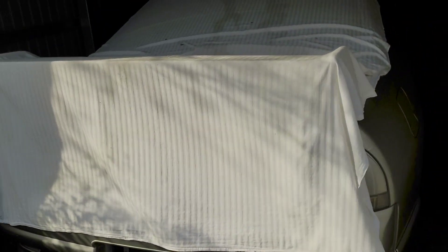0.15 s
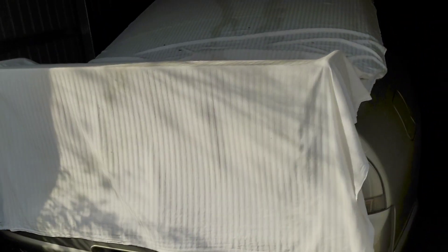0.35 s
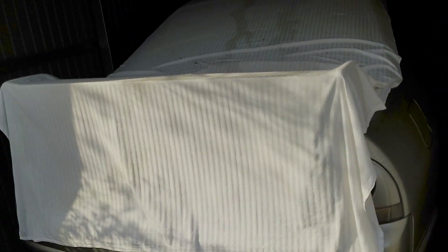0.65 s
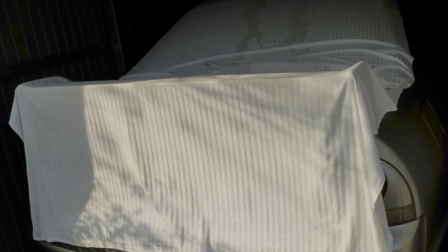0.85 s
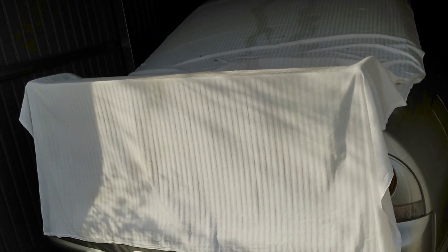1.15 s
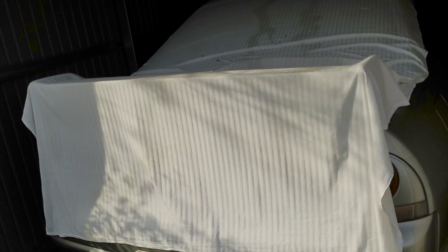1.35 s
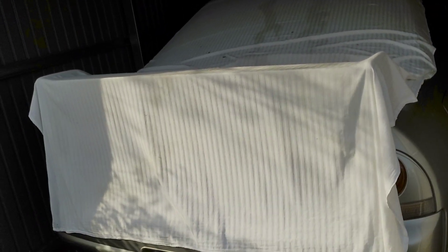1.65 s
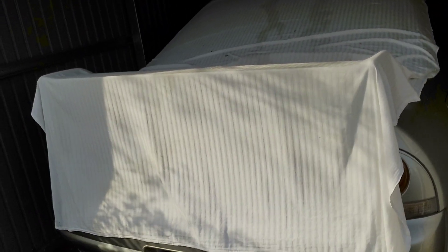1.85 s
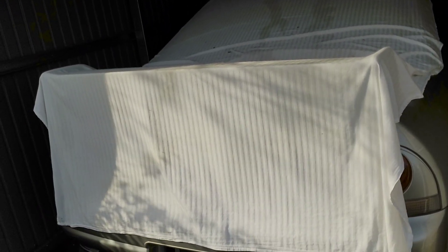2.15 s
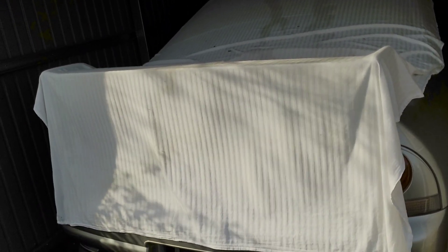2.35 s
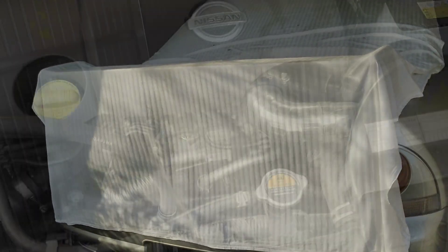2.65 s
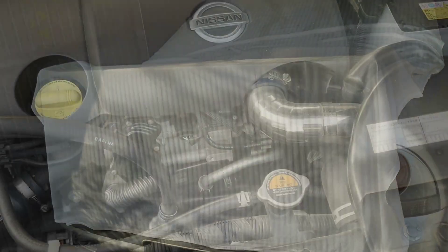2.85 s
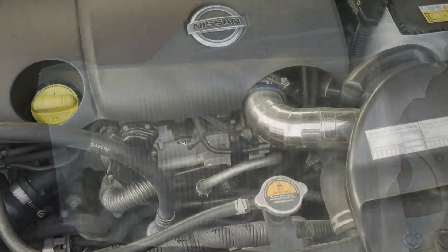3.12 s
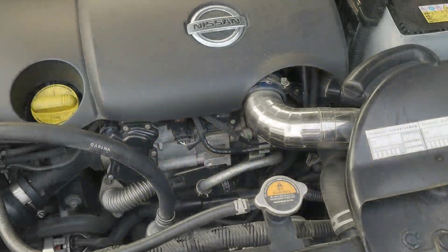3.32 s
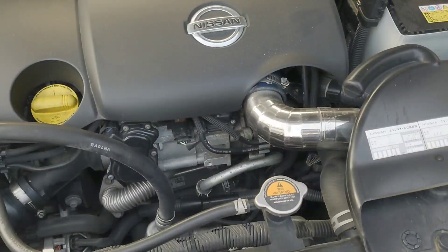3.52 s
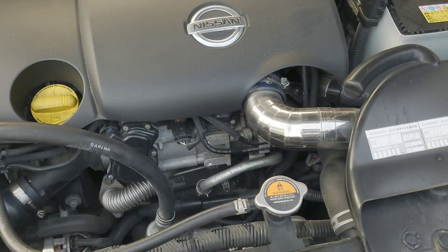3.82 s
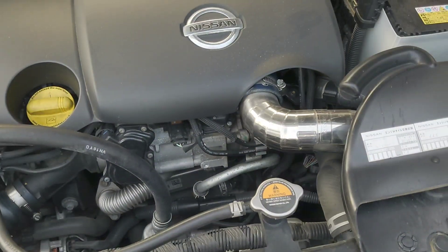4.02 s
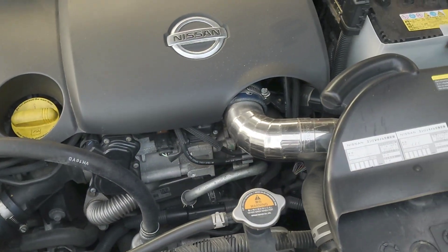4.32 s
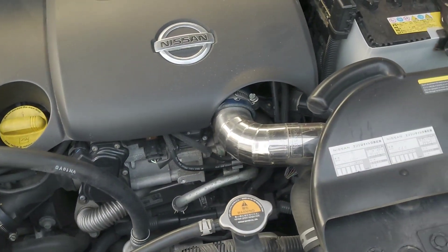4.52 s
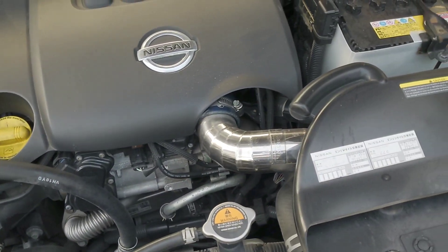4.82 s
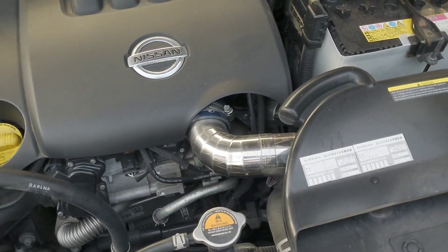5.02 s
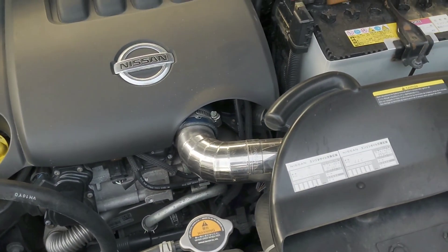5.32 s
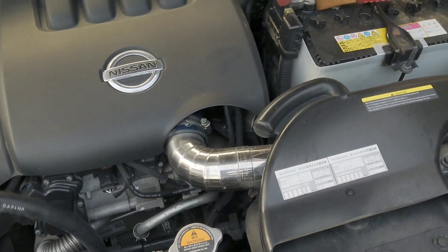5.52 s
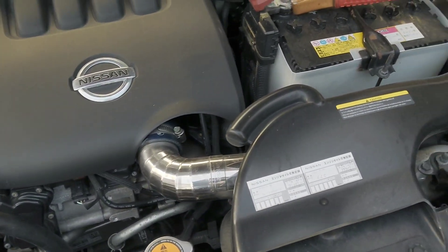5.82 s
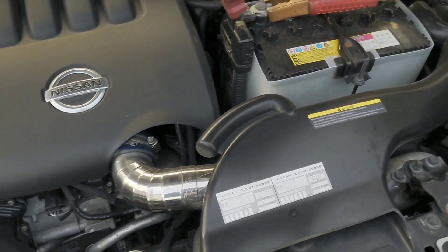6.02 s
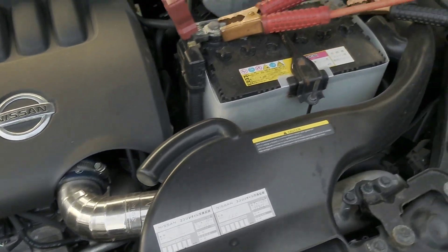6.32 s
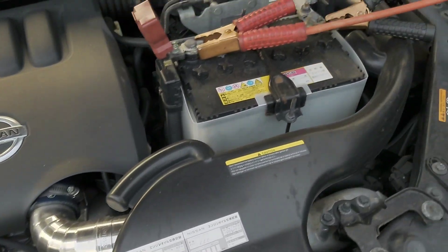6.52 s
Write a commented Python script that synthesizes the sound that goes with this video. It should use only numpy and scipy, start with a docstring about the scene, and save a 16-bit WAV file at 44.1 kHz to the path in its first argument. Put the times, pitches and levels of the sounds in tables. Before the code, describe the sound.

A steady fast engine idle, about twenty-five firings a second, heard in two close stereo views. First it is dull and smeared beneath a cover, with low wind rumble, soft thumps and a tiny early squeak. After about half a second of silence it fades in over the exposed engine, brighter and harder, rattling and hissing, bass arriving slightly late. Moving toward the side makes it less ringing and sharp.

```python
"""Around a parked car, its engine idles at about 25 firings a second, heard first under a cloth cover
while wind bumps the microphone. After a short silence it fades in again from close above the open engine bay.
Every firing gives a low throb, a clatter in the block, a bright knock and a puff of hiss: sums of tones,
shaped noise and ringing modes, in a pattern that repeats every four firings."""
import sys
import numpy as np
from scipy.fft import rfft, irfft, next_fast_len
from scipy.io import wavfile
from scipy.ndimage import uniform_filter1d, map_coordinates

SR = 44100
rng = np.random.default_rng(int(sys.argv[2]) if len(sys.argv) > 2 else 0)


def materialize(psi):
    """Save the field psi as 16-bit PCM at rate SR to the path in sys.argv[1].

    A 1-D psi becomes a single channel; in a 2-D psi each row is a channel.
    """
    bounded = np.clip(np.atleast_2d(psi).T, -1, 1)
    quanta = np.round(bounded * 32767).astype(np.int16)
    wavfile.write(sys.argv[1], SR, quanta)


N = 294147

# The four beats of a cycle. Each row: knock strength in dB, valve tick strength in dB.
BEATS = [(0, -10), (0.5, -3.5), (0.5, -1), (1.5, -5.5)]
# Tones of the low throb, under the cover and in the open.
# Each row: multiple of the firing rate, relative level in dB.
COVERED_ORDERS = [(1, -12), (2, -0.5), (3, -1.5), (4, -11)]
OPEN_ORDERS = [(1, -9), (2, 2.5), (3, -0.5), (4, -8.5), (5, -5.5), (6, -10), (7, -7.5), (8, -7)]
# Steady hum of the parts geared to the shaft. Each row: multiple of the firing rate, relative level in dB.
COVERED_HUM = [(15, -1.6), (21, -0.26), (29.5, -0.8), (34, -1.5)]
OPEN_HUM = [(15, -8), (21, -9.5), (26, 0.5), (27, 0), (31.5, -5), (35, -5.5)]
# What each firing rings: the castings, the cylinder head (open, then covered) and the valves.
# Each row: frequency in Hz, relative level in dB, time to die away by 60 dB in seconds,
# spread between the four beats in dB.
CASTING_MODES = [(584, -11, 0.081, 3.5), (788, -1, 0.099, -1.5), (986.4, 6, 0.054, 0.5),
                 (1053, -3, 0.09, -1), (1151, -8.5, 0.049, -7)]
HEAD_MODES = [(1897, 1, 0.026, 5), (1970, -1, 0.031, 0), (2680, -22.5, 0.044, 0)]
COVERED_HEAD_MODES = [(1886, -3, .03, 2.5), (1988, 7, 0.038, 1.5)]
VALVE_MODES = [(3710, -1.5, 0.052, 7), (4925, 1, 0.033, 13)]
# Colour of the block's clatter: covered, over the middle of the bay, toward its side.
# Each row: frequency in Hz, relative level in dB per Hz.
COVERED_BLOCK = [(50, -25), (85, -10.5), (103, -19.5), (204, -11.5), (242, -18), (377, -9), (415, -17),
                 (534, -16.5), (560, -20.5), (721, -15.5), (784, -17.5), (1220, -19.5), (1500, -28),
                 (1950, -67.5), (3300, -120)]
MIDDLE_BLOCK = [(59, -22), (100, -5), (184, -4), (307, -9), (376, -3), (446, -11.5), (529, -7.5),
                (599, -10), (656, -2), (718, -5), (975, -5.5), (1240, -8.5), (1500, -20), (1950, -40),
                (3300, -120)]
SIDE_BLOCK = [(59, -16), (100, -1.5), (226, -13), (280, -4.5), (311, -13.5), (376, -5), (441, -11.5),
              (663, -2), (726, -8.5), (814, -4.5), (943, -22), (1030, -7.5), (1500, -16), (1950, -28),
              (3300, -120)]
# Colour of the bright knock in the same three places.
# Each row: frequency in Hz, relative level in dB per Hz.
COVERED_KNOCK = [(820, -25), (1400, -19.5), (1490, -13), (1810, -4.5), (1960, -3.5), (2280, -8.5),
                 (2540, -9.5), (3400, -20), (3670, -15), (4460, -21.5), (4880, -15), (5340, -34),
                 (5800, -39.5), (7540, -65), (12800, -120)]
MIDDLE_KNOCK = [(820, -59), (1400, -9.5), (1530, -10), (1920, -6.5), (2020, -5.5), (2270, -13), (2650, -11),
                (3050, -26), (3560, -17.5), (3710, -16), (4130, -26.5), (4940, -31), (5340, -42),
                (5800, -31), (7540, -46), (12800, -120)]
SIDE_KNOCK = [(820, -42), (1400, -28), (1540, -11), (1710, 6.5), (1920, -5), (2120, 5), (2430, -8.5),
              (2660, -3.5), (3140, -18), (3540, -12), (4110, -16), (4820, -23), (5800, -25), (7540, -68),
              (12800, -120)]
# Colour of the hiss. Each row: frequency in Hz, relative level in dB per Hz.
COVERED_HISS = [(3000, -31.5), (4800, 3), (5600, 0), (7000, 0.5), (9000, -1.5), (12000, 1), (13600, 2.5),
                (15500, 1.5)]
OPEN_HISS = [(3000, -17), (4800, 16), (5600, -0.5), (7000, 1.5), (9000, -2), (11000, 0.5), (14000, 0.5),
             (15500, 2)]
# Stereo width of the noisy engine sounds. Each row: frequency in Hz, side level minus mid level in dB.
WIDTH = [(100, -8.5), (300, -21), (600, -5.5), (900, -2), (1300, 4), (2000, 1.5), (4000, 0), (12000, 0.5)]
# Colour of the wind outside and of the air in the bay.
# Each row: frequency in Hz, relative level in dB per Hz.
BUFFET_COLOUR = [(15, -15), (30, -6.5), (60, 4), (110, 6.5), (200, 1.5), (300, -8), (500, -12), (1000, -64)]
ROAR_COLOUR = [(25, -14), (50, -4), (90, 1), (150, -3), (190, -4), (260, -8.5), (500, -14), (1200, -41)]
# Wind bumps on the microphone. Each row: centre in seconds, level before panning in dB, frequency in Hz.
BUMPS = [(0.536, -31.5, 120), (.785, -24, 130), (0.911, -18.5, 102.4), (1.0604, -12.5, 218),
         (1.0994, -13.5, 117), (1.277, -26, 110), (1.9501, -21.5, 150)]
# Gusts on the microphone. Each row: peak time in seconds, level before flutter and panning in dB,
# rise time in seconds, fall time in seconds.
GUSTS = [(.92, -34, .17, .2), (1.09, -34.5, .03, .03), (1.46, -46.5, .08, .2), (2.06, -38, 0.085, .07),
         (2.63, -45, .03, .04), (5.67, -35, .04, .05)]
# How the idle settles, under the cover and in the open.
# Each row: first knock in seconds, extra firings a second at first, settling time in seconds.
COVERED_RUN = (.0191, .12, 1.08)
OPEN_RUN = (3.5366, .056, 1.75)

COVERED_END_S, OPEN_START_S = 2.888, 3.505
IDLE_HZ = 25  # firings a second once settled
TOP_HZ = 15750  # upper band limit
# base levels that the engine's layers are set against
COVERED_THROB_DB, COVERED_BLOCK_DB, COVERED_KNOCK_DB = -39.5, -41, -46
OPEN_THROB_DB, OPEN_BLOCK_DB, OPEN_KNOCK_DB = -35.5, -33.5, -32
# the open bay fades in; its throb stays low a moment longer, then comes up quickly
FADE_START_S, FADE_S = 3.4935, 0.12
BASS_IN_S, BASS_RISE_S, BASS_HELD_DB = 3.745, 0.056, -10.5
# the microphone moves once, part of the way from the middle of the bay to its side, where the knock is weaker
MOVE_START_S, MOVE_S, MOVE_SHARE = 4.88, 0.9, 0.61
SIDE_KNOCK_DB = -3  # change for the whole way
# moving air between gusts, before flutter and panning
BREEZE_DB, AIRFLOW_DB = -55, -47.5


def covered_engine(turn):
    """Through bonnet and cloth the knocks are dull and smeared."""
    throb_db, block_db, knock_db = COVERED_THROB_DB, COVERED_BLOCK_DB, COVERED_KNOCK_DB
    beat_db = np.transpose(BEATS)[0]
    block = contacts(turn, alike=0.34, fresh=0.295)
    block = block * surge(turn, delay=0.0008, rise=0.0044, decay=0.012, rest_db=-2.5)
    knock = contacts(turn, alike=0.093, fresh=0.51)
    knock = knock * surge(turn, delay=-0.00087, rise=0.0047, decay=0.017, rest_db=-4.5)
    hiss = rng.standard_normal((2, N))
    hiss = hiss * surge(turn, delay=-0.0024, rise=0.004, decay=0.011, rest_db=-1)
    ping = struck(turn, 0.002997, beat_db, COVERED_HEAD_MODES, scatter_db=0.7, attack=0.002)
    return (amp(throb_db) * throb(turn, COVERED_ORDERS, lead=0.366) * pan(4.0)
            + amp(block_db) * radiate(block, COVERED_BLOCK) * pan(-0.3)
            + amp(knock_db) * radiate(knock, COVERED_KNOCK) * pan(-2.3)
            + amp(block_db - 11.0) * hum(turn, COVERED_HUM, waver=0.56)
            + amp(knock_db - 8.0) * ping
            + amp(knock_db - 19.5) * radiate(hiss, COVERED_HISS))


def open_engine(turn):
    """Close above the bay every firing knocks sharply and rings the castings."""
    aside = MOVE_SHARE * ramp(MOVE_START_S, MOVE_S)  # 0 over the middle, 1 at the side
    throb_db = OPEN_THROB_DB + BASS_HELD_DB * (1 - ramp(BASS_IN_S, BASS_RISE_S))
    block_db, knock_db = OPEN_BLOCK_DB, OPEN_KNOCK_DB + SIDE_KNOCK_DB * aside
    beat_db, tick_db = np.transpose(BEATS)
    block = contacts(turn, alike=0.14, fresh=0.24)
    block = block * surge(turn, delay=-0.00096, rise=0.0045, decay=0.016, rest_db=-6.5)
    knock = contacts(turn, alike=0.16, fresh=0.28)
    knock = knock * surge(turn, delay=-0.00081, rise=0.0077, decay=0.0083, rest_db=-7.5)
    hiss = rng.standard_normal((2, N))
    hiss = hiss * surge(turn, delay=-0.002, rise=0.0062, decay=0.0086, rest_db=-15.5,
                        scatter_db=1, seat=0.18)
    body = (1 - aside) * radiate(block, MIDDLE_BLOCK) + aside * radiate(block, SIDE_BLOCK)
    bright = (1 - aside) * radiate(knock, MIDDLE_KNOCK) + aside * radiate(knock, SIDE_KNOCK)
    ring = struck(turn, 0.001934, beat_db, CASTING_MODES, scatter_db=1.5, attack=0.0024)
    ping = struck(turn, 0.0054, beat_db, HEAD_MODES, scatter_db=1.5, attack=0.0035)
    tick = struck(turn, 0.000988, tick_db, VALVE_MODES, scatter_db=1.5, attack=0.0021)
    # the ringing of the cylinder head (ping) is strongest straight above it
    return (amp(throb_db) * throb(turn, OPEN_ORDERS, lead=0.323) * pan(2.5)
            + amp(block_db + 2.5) * body * pan(1.8)
            + amp(block_db - 4) * hum(turn, OPEN_HUM, waver=0.25) * pan(0.8)
            + amp(block_db - 6.0 - 7.0 * aside) * ring * pan(0.8)
            + amp(knock_db + 1.0) * bright * pan(1)
            + amp(knock_db - 2.5 - 10 * aside) * ping * pan(-0.4)
            + amp(knock_db - 18.0 - 12.0 * aside) * tick * pan(13.0)
            + amp(knock_db - 10.5 + 1 * aside) * radiate(hiss, OPEN_HISS) * pan(2.4))


def crank(first_knock, fast_hz, settle, unsteady=0.0016):
    """Firings counted from a first knock; the shaft starts a little fast, settles and never turns quite evenly."""
    firing_rate = IDLE_HZ + fast_hz * (1 - ramp(first_knock, settle))
    turn = np.cumsum(firing_rate) / SR
    return turn - np.interp(first_knock, clock(), turn) + unsteady * wobble(12)


def throb(turn, orders, lead):
    """The low pressure pulse of each firing, a share of a beat ahead of the knock, slightly uneven in level."""
    tones = sum(amp(db) * np.cos(2 * np.pi * round(k) * (turn + lead)) for k, db in orders)
    return unit(tones) * amp(1.0 * wobble(13))


def contacts(turn, alike, fresh):
    """Dense tiny impacts as noise: part recurs at every firing, part once a cycle, part never."""
    size = round(SR / IDLE_HZ)  # samples in one firing

    def recurring(length):
        """Two noise loops of equal strength at all pitches, played at the shaft's pace."""
        pattern = irfft(np.exp(2j * np.pi * rng.random((2, length // 2 + 1))), length)
        place = [turn * size % length]
        return unit(np.array([map_coordinates(p, place, mode="grid-wrap") for p in pattern]))

    every_firing = recurring(size)
    every_cycle = recurring(size * len(BEATS))
    locked = np.sqrt(alike) * every_firing + np.sqrt(1 - alike) * every_cycle
    return np.sqrt(1 - fresh) * locked + np.sqrt(fresh) * rng.standard_normal((2, N))


def surge(turn, delay, rise, decay, rest_db, scatter_db=1.65, seat=0.64, seat_lag=0.008):
    """Each firing swells, strikes again as a valve seats, and dies away into the running noise of the chain."""
    count, part = np.divmod(turn - delay * IDLE_HZ, 1)
    count = count.astype(int)
    age = part / IDLE_HZ  # seconds since the firing
    scatter = scatter_db * rng.standard_normal(np.ptp(count) + 1)  # one draw per firing
    strength = amp(np.array(BEATS)[count % len(BEATS), 0] + scatter[count - count.min()])

    def swell(t):
        """A smooth rise, then an exponential fall."""
        rising = np.sin(np.pi / 2 * np.clip(t / rise, 0, 1)) ** 2
        return rising * np.exp(-np.maximum(t - rise, 0) / decay)

    strikes = strength * np.hypot(swell(age), seat * swell(age - seat_lag))
    return np.hypot(strikes, amp(rest_db))


def struck(turn, delay, beat_db, modes, scatter_db, attack):
    """One blow per firing rings a set of modes; each beat of the cycle has its own mix of them. Rms 1."""
    count = np.floor(turn - delay * IDLE_HZ).astype(int)
    starts = np.flatnonzero(np.diff(count)) + 1
    t = np.arange(SR // 4) / SR
    rings = np.array([amp(db - 60 * t / t60) * np.sin(2 * np.pi * hz * t) for hz, db, t60, _ in modes])
    rings = rings * (1 - np.exp(-t / attack))
    mix = rng.standard_normal((len(BEATS), len(modes)))
    mix = (mix - mix.mean(axis=0)) / mix.std(axis=0)
    mix_db = np.transpose(modes)[-1] * mix + beat_db[:, None]
    out = np.zeros(N + len(t))
    for start in starts:
        blow_db = mix_db[count[start] % len(BEATS)] + scatter_db * rng.standard_normal(len(modes))
        out[start:start + len(t)] += amp(blow_db) @ rings
    return unit(out[:N])


def hum(turn, orders, waver):
    """Clean tones locked to the shaft, each wavering a little in phase, rms 1."""
    total = 0
    for k, db in orders:
        half_step = round(2 * k) / 2  # whole or half multiples only
        phase = 2 * np.pi * half_step * turn - k / 2 + waver * wobble(2.97)
        total = total + amp(db) * np.cos(phase)
    return unit(total)


def radiate(pair, spectrum):
    """Colour two noisy signals and spread them as mid and side, rms 1."""
    def response(hz):
        """Shared colour, with the side channel weighted by the width."""
        return amp(along(spectrum, hz)) * amp([0 * hz, along(WIDTH, hz)])

    mid, side = filtered(pair, response)
    return unit(np.array([mid + side, mid - side]))


def wind():
    """A light gust rumbles on the microphone, with a few single pushes of air."""
    flutter = amp(2.3 * wobble(25.36))
    rumble = air_strength(BREEZE_DB) * flutter * buffet(BUFFET_COLOUR, shared=0.71)
    for s, db, hz in BUMPS:
        cycles = (clock() - s) * hz
        rumble = rumble - amp(db) * np.sin(2 * np.pi * cycles) * np.exp(-np.abs(cycles / 0.32) ** 1.2)
    return rumble * pan(12.0)


def airflow():
    """Air stirred up in the bay rumbles on the microphone."""
    flutter = amp(3.0 * wobble(9.2))
    return air_strength(AIRFLOW_DB) * flutter * buffet(ROAR_COLOUR, shared=1.0) * pan(1.0)


def air_strength(steady_db):
    """Each gust swells and dies away over a steady draught; their powers add."""
    t = clock()
    gusts = [amp(db) * np.exp(-np.maximum((s - t) / rise, (t - s) / fall)) for s, db, rise, fall in GUSTS]
    return np.sqrt(amp(steady_db) ** 2 + np.sum(np.square(gusts), axis=0))


def buffet(spectrum, shared):
    """Moving air on the two microphone ports, only partly alike, rms 1."""
    ports = rng.standard_normal((2, N)) + shared * rng.standard_normal(N)
    return unit(filtered(ports, lambda hz: amp(along(spectrum, hz))))


def squeak(s=0.1937, hz=2880, db=-29, width=0.00088):
    """One tiny high squeak: a tone under a very short bell-shaped swell."""
    t = clock() - s
    return amp(db) * np.sin(2 * np.pi * hz * t) * np.exp(-(t / width) ** 2) * pan(3.3)


def brief_ring(s=3.507, hz=890, db=-41, t60=0.66):
    """A faint short ringing note: one tone dying away by 60 dB in t60 seconds."""
    t = np.maximum(clock() - s, 0)
    return amp(db - 60 * t / t60) * np.sin(2 * np.pi * hz * t)


def amp(db):
    """Decibels to gain."""
    return 10 ** (np.asarray(db) / 20)


def unit(x):
    """Scale to rms 1."""
    return x / np.sqrt(np.mean(x ** 2) + 1e-20)


def clock():
    """Seconds at every sample."""
    return np.arange(N) / SR


def ramp(start, length):
    """From 0 to 1 in length seconds."""
    return np.clip((clock() - start) / length, 0, 1)


def wobble(rate):
    """A smooth random curve, rate knots a second."""
    knots = rng.standard_normal(int(N * rate / SR) + 4)
    return map_coordinates(knots, [clock() * rate])


def along(points, hz):
    """Read a curve of (Hz, value) points on a log frequency axis."""
    f, v = np.transpose(points)
    return np.interp(np.log(hz + 1), np.log(f + 1), v)


def filtered(x, response):
    """x times a response of frequency."""
    m = next_fast_len(N + SR // 2)  # spare room so the end does not wrap onto the start
    return irfft(rfft(x, m) * response(np.fft.rfftfreq(m, 1 / SR)), m)[..., :N]


def pan(left_db):
    """Gains of the two channels for a left-minus-right level."""
    return amp(np.array([[left_db], [-left_db]]) / 2)


def scene():
    """The covered car, a silence, then the open bay fading in."""
    covered_turn, open_turn = crank(*COVERED_RUN), crank(*OPEN_RUN)
    # on/off switches with edges softened over 64 samples
    before = uniform_filter1d(1.0 * (clock() < COVERED_END_S), size=64)
    after = uniform_filter1d(1.0 * (clock() > OPEN_START_S), size=64)
    fade = 1 - np.exp(-np.maximum(clock() - FADE_START_S, 0) / FADE_S)
    covered = covered_engine(covered_turn) + wind() + squeak()
    opened = fade * (open_engine(open_turn) + airflow()) + brief_ring()
    return before * covered + after * opened


def record(dry):
    """Cut the sound off steeply above the band limit."""
    return filtered(dry, lambda hz: 1 / (1 + (hz / TOP_HZ) ** 200))


dry = scene()
out = record(dry)
materialize(out)
```